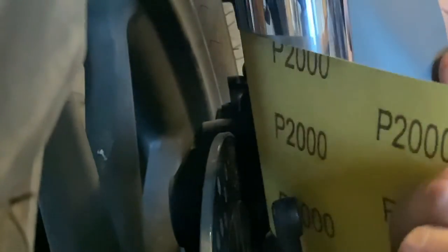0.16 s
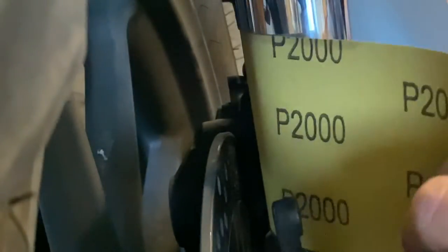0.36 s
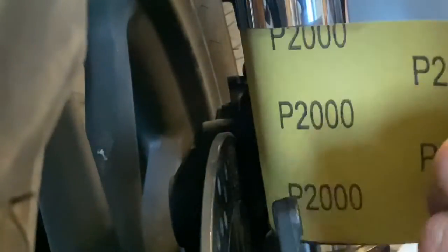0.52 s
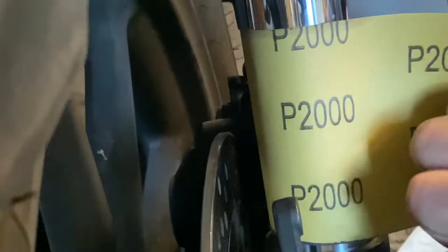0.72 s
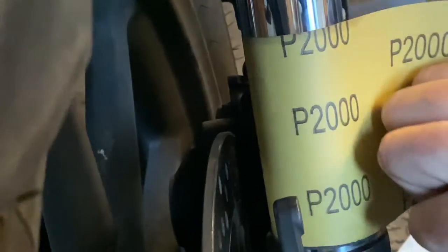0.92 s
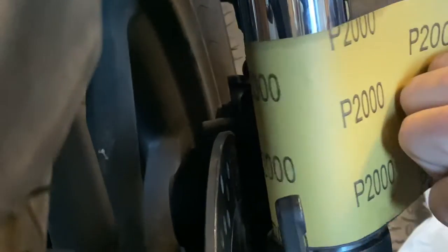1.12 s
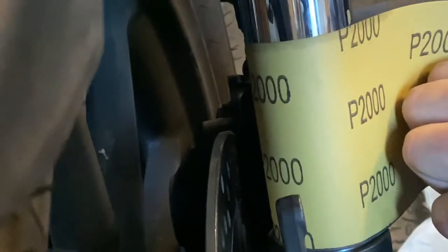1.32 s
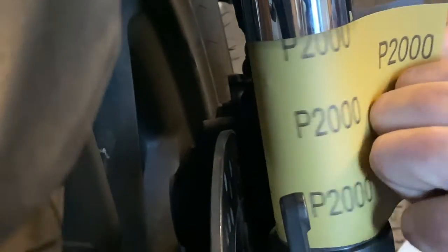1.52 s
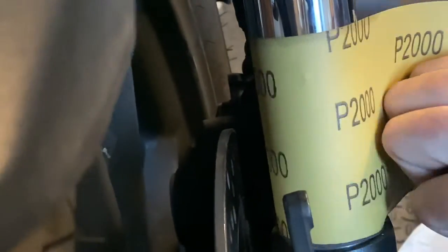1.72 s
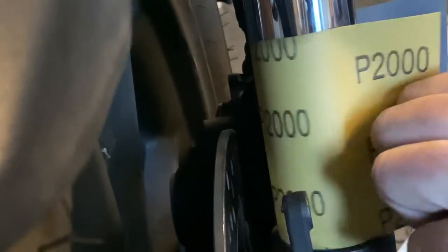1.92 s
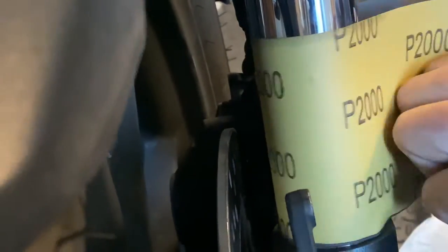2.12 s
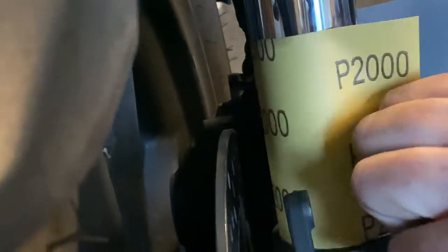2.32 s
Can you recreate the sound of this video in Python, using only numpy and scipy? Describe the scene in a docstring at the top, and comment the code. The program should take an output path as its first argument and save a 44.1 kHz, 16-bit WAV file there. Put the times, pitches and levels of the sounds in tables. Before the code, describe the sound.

Wet sandpaper rubs a metal tube close to the microphone in a garage. It starts with a faint rustle and one hollow knock, drags in slow grainy strokes, pauses briefly, then scrubs quickly back and forth with tiny squelches.

```python
"""Wet sandpaper on a metal tube

A hollow knock rings the tube's modes and echoes in a garage. Wet fine sandpaper, wrapped round the tube,
drags slowly over it: grainy noise that follows the hand, with rasps, rustle, faint tones and room rumble.
Then the paper shuttles quickly to and fro, hissing with stroke speed. Small wet squelches (short, noisy
gliding notes) and ticks come with it, over a thin low hum."""
import sys
import numpy as np
from scipy import signal
from scipy.io import wavfile
from scipy.ndimage import uniform_filter1d

SR = 44100
rng = np.random.default_rng(int(sys.argv[2]) if len(sys.argv) > 2 else 0)


def bounce(signal):
    """Save signal as a 16-bit WAV file at the path given by the first command-line argument."""
    frames = np.transpose(np.atleast_2d(signal))
    limited = np.clip(frames, -1, 1)
    pcm = np.round(limited * 32767).astype(np.int16)
    wavfile.write(sys.argv[1], SR, pcm)


N = 103635
SHUTTLE_FROM_S, CROSSFADE_S = 1.42, 0.027

# slow drag: t/s, body level/dB, fizz level/dB
DRAG_LEVELS = [(0, -40.5, -39), (.13, -40.5, -36.5), (.2, -41, -42), (.228, -45.5, -45), (.25, -37.5, -43),
               (.36, -50, -45.5), (.47, -48, -39.5), (.54, -49, -46), (.62, -48.5, -42.5),
               (.68, -41.5, -39.5), (.71, -36, -24), (.735, -34.5, -24.5), (.77, -36.5, -34),
               (.81, -46, -43), (.86, -39, -35), (.9, -37.5, -34.5), (.96, -33, -29), (1.06, -32.5, -28),
               (1.191, -36.5, -30.5), (1.205, -36, -43), (1.217, -52, -46), (1.28, -66.5, -66.5),
               (1.31, -73, -76), (1.42, -73.5, -73)]
# paper resonances: f/Hz, width/Hz, lift/dB
PAPER_PEAKS = [(1450, 120, 6.5), (2250, 250, 4), (2850, 230, 3.5), (4200, 850, 3.5), (5800, 460, 8)]
# quick strokes: start/s, end/s, hiss level/dB, scrape level/dB, place of top speed/0-1
QUICK_STROKES = [(1.383, 1.515, -37.5, -55.5, 0.68), (1.521, 1.603, -37.5, -47.5, 0.61),
                 (1.625, 1.684, -31.5, -46, 0.47), (1.685, 1.769, -37, -47.5, 0.7),
                 (1.774, 1.836, -34, -47, 0.55), (1.843, 1.909, -38, -47.5, 0.66),
                 (1.915, 1.973, -32, -52.5, 0.36), (1.974, 2.042, -35.5, -47.5, 0.7),
                 (2.047, 2.11, -32.5, -48, 0.54), (2.112, 2.173, -38, -46.5, 0.67),
                 (2.177, 2.241, -36.5, -49, 0.6), (2.241, 2.304, -38.5, -48, 0.69),
                 (2.307, 2.375, -36.5, -51.5, 0.54)]
# friction spectra, slow (body, fizz) and quick (hiss, scrape): f/Hz, relative level/dB
BODY_SPECTRUM = [(300, -14), (900, -12), (1600, -10), (2300, -3), (4300, -1), (5800, -6), (7500, -10),
                 (10000, -22.5)]
FIZZ_SPECTRUM = [(3000, -37), (6000, -7.5), (8000, -3.5), (10000, -5.5), (13000, -11.5), (16000, -3)]
HISS_SPECTRUM = [(3000, -22), (6500, -9), (7600, -3), (10000, -1), (12000, -3), (14000, -2.5), (16000, 0.5)]
SCRAPE_SPECTRUM = [(500, -15), (900, -9.5), (1500, -2.5), (2500, -1.5), (4000, -0.5), (6500, -1.5),
                   (9000, -11.5)]
# blow and bounce: t/s, gain/dB
KNOCK_HITS = [(0.232, -2), (0.264, -25)]
# tube modes: f/Hz, relative level/dB, t60/s
TUBE_MODES = [(184.4, -10.5, 0.062), (376, -9, 0.027), (886, -14.5, 0.064), (1330, -7.5, 0.04),
              (1570, -17, 0.065), (1745, -6, 0.085), (1935, -32, .07), (2103, -28, 0.35), (2253, -10, 0.1),
              (2390, 2.5, 0.024), (3120, -10, 0.027), (3520, -11, 0.033), (4560, -33, 0.12),
              (5400, -14, .03)]
# noise bursts of the blow: f/Hz, relative level/dB
SPLASH_SPECTRUM = [(200, -21), (700, -4), (1100, -4), (2000, 1), (3000, -0.5), (4500, -10), (7000, -19.5),
                   (12000, -31.5)]
SNAP_SPECTRUM = [(2000, -16), (3300, 9), (5500, -8.5), (9000, -18.5), (16000, -22)]
# garage decay: f/Hz, t60/s
GARAGE_DECAY = [(200, 0.61), (1000, 0.31), (2000, 0.39), (4000, .25), (10000, 0.29)]
# fuzzy notes: start/s, length/s, level/dB, first f/Hz, last f/Hz, width/Hz
SQUELCH_NOTES = [(1.477, 0.016, -45.5, 1690, 1580, 300), (1.567, 0.013, -47.5, 2520, 2480, 300),
                 (1.658, .022, -44, 1505, 1480, 250), (1.712, .03, -40, 4600, 2995, 900),
                 (1.738, 0.0095, -42.5, 2470, 2210, 400), (1.748, 0.006, -40, 1500, 1490, 300),
                 (1.752, .016, -43, 556, 574, 90), (1.784, 0.047, -53.5, 1230, 1610, 200),
                 (1.856, 0.022, -39.5, 4024, 3500, 600), (1.877, 0.012, -49, 547, 545, 100),
                 (1.99, 0.035, -52, 4330, 1600, 900), (2.127, 0.029, -58, 4200, 1970, 900),
                 (1.944, 0.012, -49, 1305, 1260, 250), (2.329, .012, -47, 1020, 1060, 200),
                 (1.88, 0.018, -49, 1310, 1680, 400), (1.909, 0.019, -48.5, 1190, 1180, 150),
                 (1.961, 0.013, -49.5, 3540, 3500, 150), (2.028, 0.026, -46.5, 1430, 1470, 100),
                 (2.082, 0.0053, -40, 2060, 2060, 500), (2.0905, 0.0054, -35, 1730, 1570, 400),
                 (2.091, 0.0044, -45, 4240, 4200, 800), (2.067, 0.025, -47, 1210, 1410, 400),
                 (2.148, 0.013, -44.5, 2040, 1450, 520), (2.29, 0.011, -49.5, 610, 600, 150),
                 (2.152, .014, -46.5, 600, 570, 120), (2.213, .009, -44.5, 1460, 1460, 250),
                 (2.285, 0.029, -45.5, 1600, 1450, 350)]
RASP_NOTES = [(.35, 0.2, -48.5, 3120, 3050, 250), (.87, 0.21, -41, 4094, 4380, 400),
              (.98, 0.19, -44, 5800, 5880, 300)]
FAINT_NOTES = [(0.59, 0.11, -51.5, 342, 317, 25), (0.709, 0.098, -45, 188, 225, 68),
               (0.844, 0.075, -47.5, 266, 327, 75), (0.95, 0.12, -52.5, 327, 287, 28),
               (1.136, 0.13, -51.5, 278.3, 280, 30), (1.211, 0.052, -57, 1330, 1314, 30),
               (1.297, .085, -58, 1354, 1320, 20), (1.38, 0.045, -46.5, 195, 190, 20)]
HUM_NOTE = (1.13, 1.45, -58.5, 355, 353.5, 3.5)
# sheet rustle, garage rumble, hum: f/Hz, relative level/dB
RUSTLE_SPECTRUM = [(150, -20.5), (400, -3.5), (900, 0.5), (1500, 0.5), (2200, 5), (3500, -16)]
RUMBLE_SPECTRUM = [(15, -34), (30, -18.5), (63, -2), (92, 0.5), (140, -13), (342, -14.5), (662, -17),
                   (1200, -39.5), (2500, -37), (7000, -52.5), (16000, -81.5)]
HUM_SPECTRUM = [(30, -50), (130, -8), (240, 1.5), (350, -2.5), (450, -1.5), (700, -12.5), (1000, -9),
                (2000, -27)]
# sheet rustle: t/s, level/dB
RUSTLE_LEVELS = [(0, -52), (.2, -49.5), (.35, -53.5), (.47, -56.5), (.62, -49), (.73, -44), (.82, -47),
                 (.96, -57), (1.19, -53), (1.22, -62.5), (1.42, -63.5)]
# garage rumble: t/s, relative level/dB
RUMBLE_LEVELS = [(0, 0), (.19, 2.5), (.3, 5), (.47, -2), (.6, -1), (.72, 2), (.9, 2), (.98, -7.5),
                 (1.1, -0.5), (1.42, -0.5)]
# stereo side signal: f/Hz, gain/dB
DRAG_SIDE = [(60, -11.5), (300, -10), (700, -3), (1500, 1), (2100, -32), (6500, -66), (8000, -19),
             (16000, -18)]
SHUTTLE_SIDE = [(60, -22), (300, -15.5), (700, -7), (1500, -19.5), (4500, -29.5), (6000, 1), (8000, -23),
                (16000, -12.5)]
KNOCK_SIDE = [(60, -15), (200, -6), (600, -2), (1200, 1.5), (2500, -10.5), (4500, -16), (16000, -12)]


def drag():
    """Slow strokes: the paper's body and the fine fizz follow the hand."""
    body = envelope(DRAG_LEVELS) * grit(BODY_SPECTRUM, grain_db=1.8, patch_db=2.7, peaks=PAPER_PEAKS)
    fizz = envelope(DRAG_LEVELS, column=2) * grit(FIZZ_SPECTRUM, grain_db=1.1, patch_db=1.2)
    return body + fizz


def shuttle(linger_s=0.011, linger_db=-26.5, floor_db=-60.5):
    """Quick strokes: speed arches from turn to turn; the hiss lingers a little."""
    drive = np.zeros((2, N))
    for start_s, end_s, hiss_db, scrape_db, top in QUICK_STROKES:
        skew = np.log(.5) / np.log(np.clip(top, .1, .9))
        progress = np.linspace(0, 1, round((end_s - start_s) * SR)) ** skew
        speed = abs(np.sin(np.pi * progress)) ** 0.46  # rounded arch
        add(drive[0], start_s, gain_of(hiss_db) * speed)
        add(drive[1], start_s, gain_of(scrape_db) * speed)
    pole = np.exp(-1 / (linger_s * SR))
    tail = signal.lfilter([1 - pole], [1, -pole], drive)
    hiss_gain, scrape_gain = drive + gain_of(linger_db) * tail + gain_of(floor_db)
    hiss = grit(HISS_SPECTRUM, grain_db=0.95, patch_db=4.0)
    scrape = grit(SCRAPE_SPECTRUM, grain_db=2.9, patch_db=3.7) + wet_ticks()
    return hiss_gain * hiss + scrape_gain * scrape


def knocks(rise_s=.0028, crack_hz=1950, crack_s=.001, splash_t60_s=0.057, snap_t60_s=0.018):
    """Hollow blow and one small bounce: decaying tube modes, a crack and two noise bursts."""
    t = np.arange(round(.3 * SR)) / SR
    age_s = t - rise_s
    ring = sum(gain_of(db - 60 * t / t60) * np.sin(2 * np.pi * hz * age_s) for hz, db, t60 in TUBE_MODES)
    bent_s = age_s + .35 * np.minimum(age_s, 0) ** 2 / (2 * rise_s)  # pitch climbs into the blow
    crack = gain_of(10) * np.cos(2 * np.pi * crack_hz * bent_s) / np.cosh(np.minimum(age_s / crack_s, 30))
    crack *= np.minimum(4 * t / rise_s, 1)
    splash = gain_of(-10.5 - 60 * t / splash_t60_s) * grit(SPLASH_SPECTRUM)[:len(t)]
    snap = gain_of(-17 - 60 * abs(age_s) / snap_t60_s) * grit(SNAP_SPECTRUM)[:len(t)]
    attack = np.sin(np.pi / 2 * np.minimum(t / rise_s, 1)) ** 2
    blow = attack * (0.43 * ring + splash + snap) + 0.28 * crack
    out = np.zeros(N)
    for start_s, db in KNOCK_HITS:
        add(out, start_s, gain_of(db) * blow)
    return out


def squelches():
    """Small wet squelches: brief, half-pitched glides."""
    return fuzzy_notes(SQUELCH_NOTES, tone_ratio=.45)


def wet_ticks(rate_per_s=300, relative_db=-15, decay_cycles=3.3):
    """Sparse wet ticks, a few large: damped sines at 12 pitches."""
    size_db = 3.7 * np.minimum(rng.exponential(1, N), 4)
    impulses = gain_of(size_db) * (rng.random(N) < rate_per_s / SR)
    pitch_index = rng.integers(0, 12, N)
    out, t = np.zeros(N), np.arange(90) / SR
    for k, hz in enumerate(np.geomspace(1400, 12000, num=12)):
        tick = np.sin(2 * np.pi * hz * t) * np.exp(-t * hz / decay_cycles)
        out += signal.oaconvolve(impulses * (pitch_index == k), tick)[:N]
    return gain_of(relative_db) * unit_rms(out)


def rasps():
    """Raspy patches in the slow strokes: narrow noise bands."""
    return fuzzy_notes(RASP_NOTES, tone_ratio=0)


def rustle():
    """The loose sheet rustles lower than the grit."""
    return envelope(RUSTLE_LEVELS) * grit(RUSTLE_SPECTRUM, grain_db=2.7, patch_db=3.0)


def faint_tones():
    """Faint tones under and between the slow strokes."""
    return fuzzy_notes(FAINT_NOTES, tone_ratio=1.3)


def garage_echo(sound, wet_db=-15.5):
    """Direct sound plus a diffuse tail, longest in the bass."""
    hz, t, bins = signal.stft(rng.standard_normal(SR // 2), SR, nperseg=256)
    decay = gain_of(-60 * t / at_hz(GARAGE_DECAY, hz)[:, None])
    tail = signal.istft(bins * decay, nperseg=256)[1]
    return sound + gain_of(wet_db) * signal.fftconvolve(sound, tail / np.linalg.norm(tail))[:N]


def rumble(level_db=-49):
    """Garage air: low noise that swells and dips."""
    return gain_of(level_db) * envelope(RUMBLE_LEVELS) * grit(RUMBLE_SPECTRUM, patch_db=2.0)


def hum(noise_db=-55):
    """Low noise with one thin tone."""
    return gain_of(noise_db) * grit(HUM_SPECTRUM, patch_db=1.5) + fuzzy_notes([HUM_NOTE], tone_ratio=1.3)


def grit(spectrum, grain_db=0, patch_db=0, peaks=()):
    """Unit-RMS coloured noise; grain_db varies grain size, patch_db sets drifting spectral patches."""
    noise = rng.standard_normal(N)
    size = unit_rms(uniform_filter1d(rng.standard_normal(N), size=24))
    hz, _, bins = signal.stft(noise * gain_of(grain_db * size), SR, nperseg=1024, noverlap=768)
    patches = uniform_filter1d(rng.standard_normal(bins.shape), size=8, axis=0)
    patches = unit_rms(uniform_filter1d(patches, size=5, axis=1))
    lift_db = sum(db / (1 + (2 * (hz - peak_hz) / width_hz) ** 2) for peak_hz, width_hz, db in peaks)
    colour_db = at_hz(spectrum, hz) + lift_db
    bins = bins * gain_of(colour_db[:, None] + patch_db * patches)
    return unit_rms(signal.istft(bins, nperseg=1024, noverlap=768)[1][:N])


def fuzzy_notes(notes, tone_ratio):
    """Gliding noise bands, each with a pure tone at tone_ratio times its amplitude."""
    out = np.zeros(N)
    for start_s, length_s, db, first_hz, last_hz, width_hz in notes:
        progress = np.linspace(0, 1, round(length_s * SR))
        noise = [1, 1j] @ rng.standard_normal((2, 2 * SR))
        wobble = unit_rms(signal.lfilter([1], [1, -np.exp(-np.pi * width_hz / SR)], noise))
        hz = first_hz * (last_hz / first_hz) ** progress
        carrier = np.exp(2j * np.pi * np.cumsum(hz) / SR)
        tone = ((tone_ratio + wobble[-len(progress):]) * carrier).real
        add(out, start_s, gain_of(db) * unit_rms(tone) * np.sin(np.pi * progress ** 0.65))
    return out


def stereo(mono, side_gains, twist, twist_from_hz=6850, turn_hz=3470):
    """Two channels: a random-phase side signal; treble phases turn apart with frequency."""
    hz, _, bins = signal.stft(mono, SR, nperseg=512, noverlap=384)
    side = bins * gain_of(at_hz(side_gains, hz))[:, None] * np.exp(2j * np.pi * rng.random(bins.shape))
    turn = np.exp(1j * np.pi * twist * np.maximum(hz - twist_from_hz, 0) / turn_hz)[:, None]
    channels = np.array([bins * turn + side, bins / turn - side])
    return signal.istft(channels, nperseg=512, noverlap=384)[1][:, :N]


def gain_of(db):
    return 10 ** (np.asarray(db) / 20)


def unit_rms(x):
    return x / np.sqrt(np.mean(abs(x) ** 2) + 1e-20)


def at_hz(table, hz):
    table_hz, values = np.transpose(table)
    return np.interp(np.log(hz + 1), np.log(table_hz + 1), values)


def envelope(levels, column=1):
    columns = np.transpose(levels)
    return gain_of(np.interp(np.arange(N) / SR, columns[0], columns[column]))


def add(mix, start_s, sound):
    part = mix[round(start_s * SR):][:len(sound)]
    part += sound[:len(part)]


def scene():
    """Knock and slow strokes give way abruptly to quick strokes with no deep bass."""
    slow = drag() + rustle() + rumble() + faint_tones() + rasps()
    slow = stereo(slow, DRAG_SIDE, twist=1) + stereo(garage_echo(knocks()), KNOCK_SIDE, twist=0.93)
    low_cut = signal.butter(4, 97, "high", fs=SR, output="sos")
    quick = signal.sosfilt(low_cut, shuttle() + squelches() + hum())
    quick = stereo(quick, SHUTTLE_SIDE, twist=0)
    fade = np.clip((np.arange(N) / SR - SHUTTLE_FROM_S) / CROSSFADE_S + .5, 0, 1)
    return slow * (1 - fade) + quick * fade


def record(dry, cutoff_hz=15750):
    """Soft overload, then low-pass."""
    limited = dry / (1 + dry ** 8) ** (1 / 8)
    low_pass = signal.firwin(511, cutoff_hz, window=("kaiser", 9), fs=SR)
    return signal.oaconvolve(limited, low_pass[None], "same")


dry = scene()
out = record(dry)
bounce(out)
```